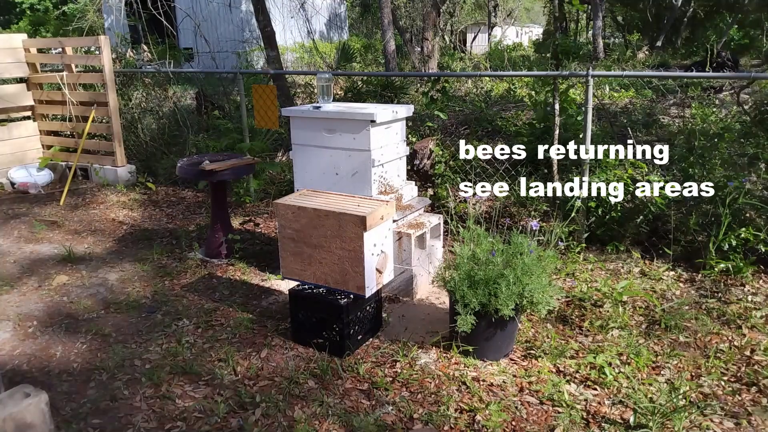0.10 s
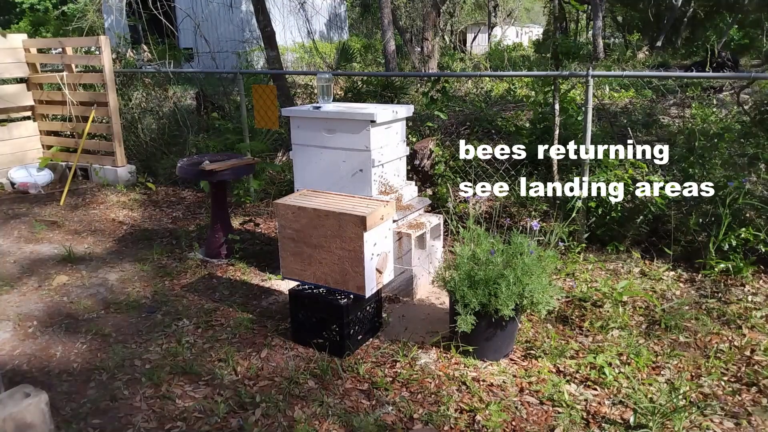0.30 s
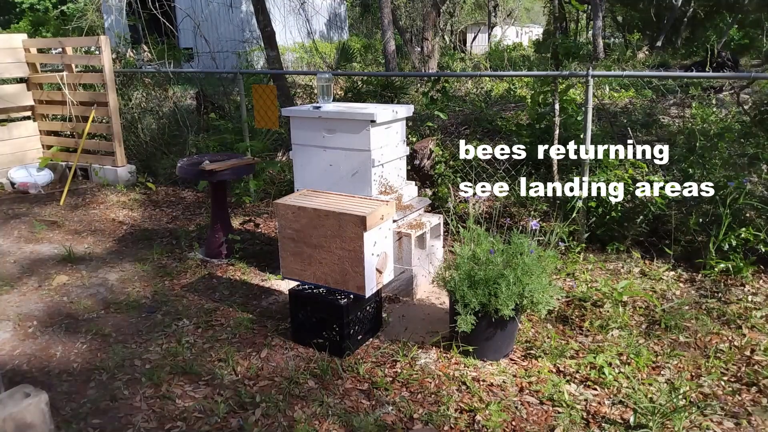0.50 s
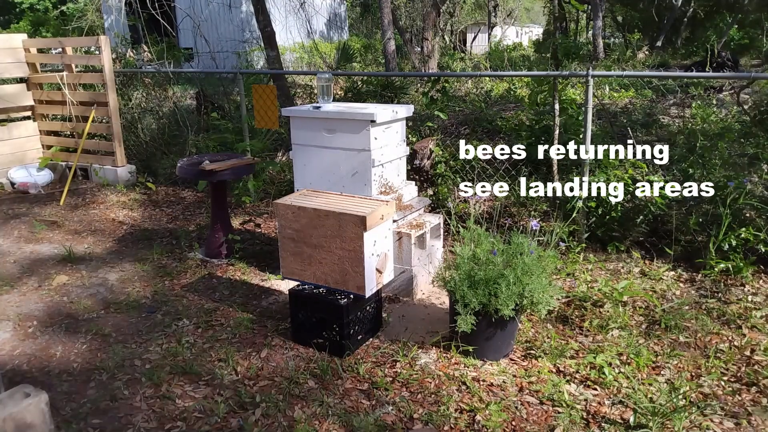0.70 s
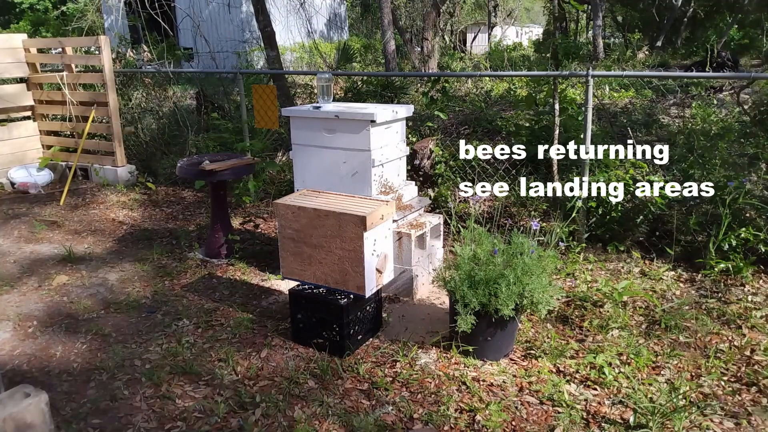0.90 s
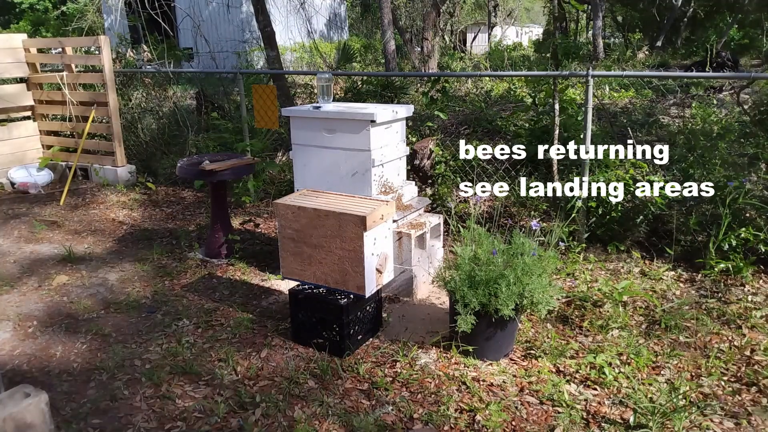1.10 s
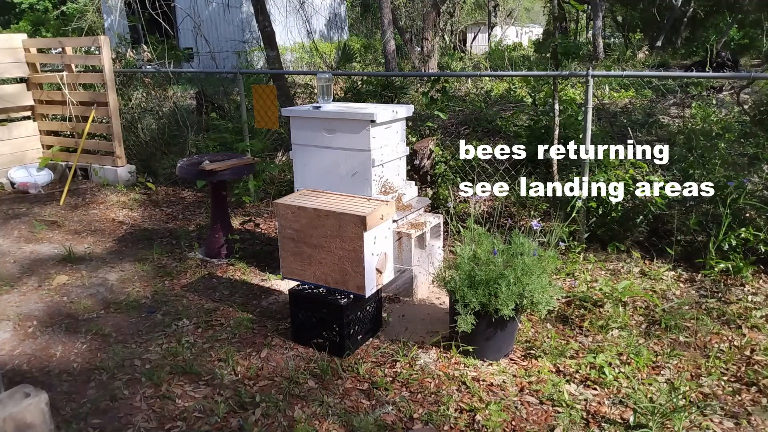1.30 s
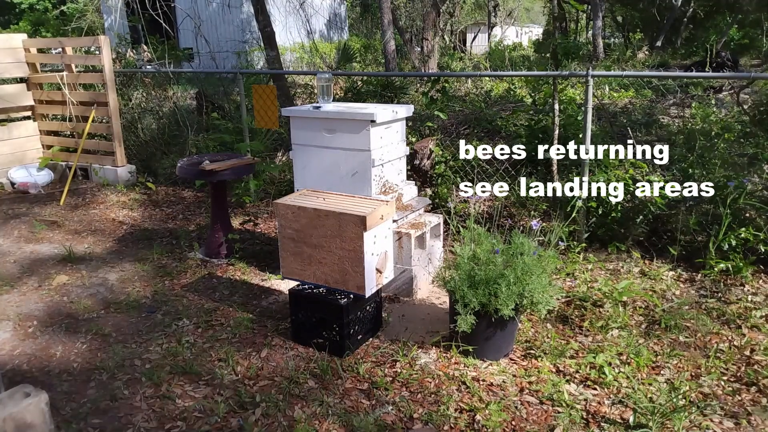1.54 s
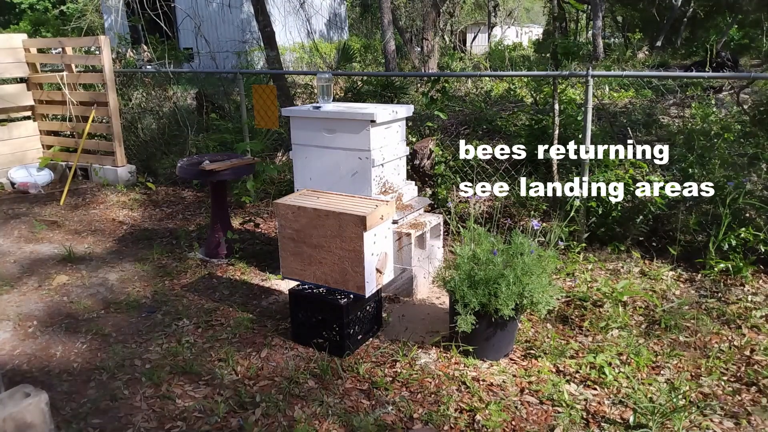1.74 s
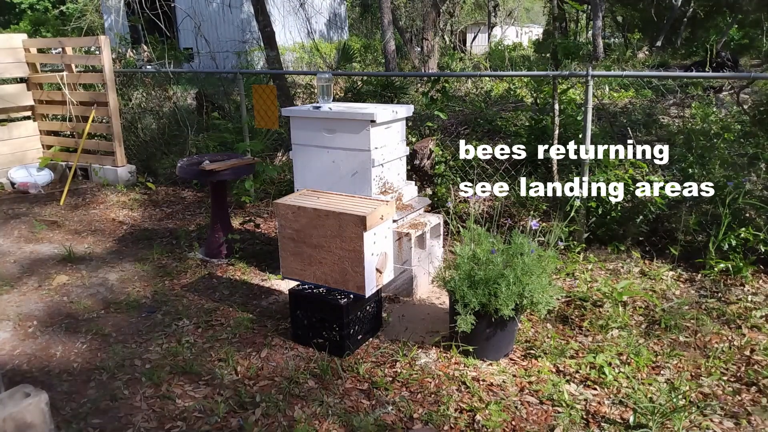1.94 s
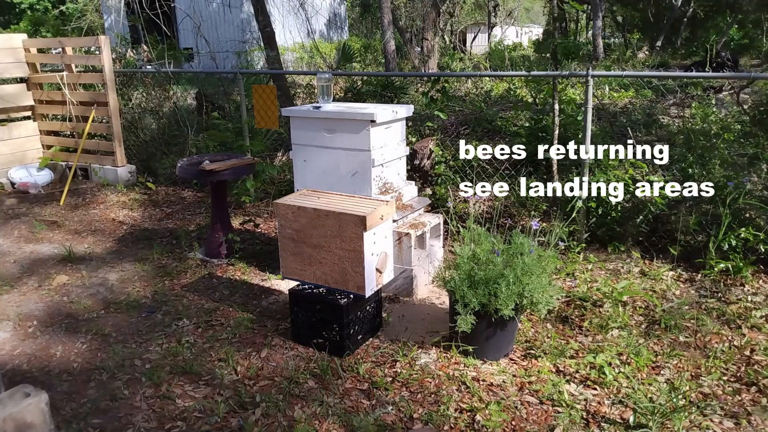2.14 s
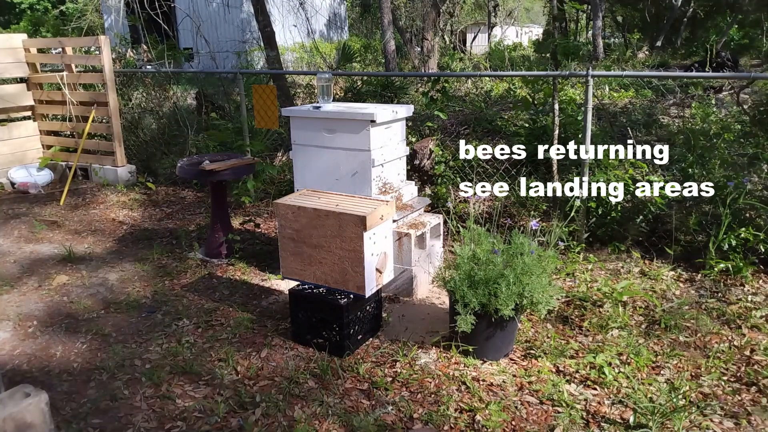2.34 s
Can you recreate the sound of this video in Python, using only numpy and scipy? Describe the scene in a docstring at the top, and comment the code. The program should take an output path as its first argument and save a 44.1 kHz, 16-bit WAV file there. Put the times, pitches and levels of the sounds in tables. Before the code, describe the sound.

Honey bees hum steadily around hives in a backyard, single bees swelling past, under a thin high insect chorus; wind thumps the stereo microphone early, then dry leaves crackle and a twig snaps close on the right.

```python
"""Honey bees hum around their hives in a backyard, under a high, steady chorus of insects in the trees.
From the start bees hum as harmonic wingbeats, some swelling as they pass; filtered noise makes the chorus.
A light gust of low noise and short thumps buffets the stereo microphone during the first half.
One shrill chorus then gives way to another. Near the end dry leaves crackle close by on the right as
tiny noise bursts, and a small twig snaps as a few short, high ringing modes."""
import sys
import numpy as np
from scipy.fft import rfft, irfft, next_fast_len
from scipy.io import wavfile
from scipy.ndimage import map_coordinates

SR = 44100
rng = np.random.default_rng(int(sys.argv[2]) if len(sys.argv) > 2 else 0)


def persist_wave(psi):
    """Save psi, clipped to +-1, as 16-bit WAV."""
    counts = np.round(np.clip(psi, -1, 1) * 32767).astype(np.int16)
    wavfile.write(sys.argv[1], SR, np.atleast_2d(counts).T)


N = 110250

# The swarm around the hives: wingbeats from slowest to fastest bees, in equal shares: (wingbeat [Hz])
SWARM_WINGBEATS = [195.85, 232.9, 245.1, 251.7, 259.5, 266.2, 274.5]
# Swell of the whole swarm: (time [s], level [dB])
SWARM_SWELL = [(0, -65.5), (.3, -63), (.42, -61.5), (.8, -59), (1.0, -64), (2.0, -64.5), (2.5, -66.5)]
# Single bees passing the microphone:
# (time [s], wingbeat [Hz], glide [Hz per s], level [dB], overtones against the wingbeat [dB])
BEE_PASSES = [(0.101, 274.8, -150, -71.5, 5), (.425, 265.5, -170, -63.5, 4.5), (.6, 257.9, 120, -56, -2),
              (0.711, 256, -100, -58, -4), (0.781, 236, -130, -55.5, -12), (0.789, 263.6, 39.5, -63, 3),
              (0.976, 259.6, 0, -59.5, -2.5), (1.246, 262.5, 169, -60, -5), (1.6, 266, 69.5, -63.5, 1),
              (1.73, 267.4, -59.5, -63, -9), (2.158, 252, -130, -61, -8), (2.289, 246, -60.5, -66, -3)]
WING_DRIFT, WING_FLUTTER = .026, .021  # slow and quick pitch change, as a fraction
FLIGHT_DB, TURN_DB = 3.5, 2  # swing of each bee's level; swing of its overtones as it turns
PASS_S = .038  # a pass swells and fades as a bell curve of this half width


def bees(count=24):
    """A swarm of wingbeats drifting in pitch, level and overtones, with single bees passing."""
    ranks = (np.arange(count) + .5) / count
    shares = np.linspace(0, 1, len(SWARM_WINGBEATS))
    swarm = 0
    for wingbeat_hz in np.interp(ranks, shares, SWARM_WINGBEATS):
        flight = amp(FLIGHT_DB * wobble(6.08))
        hz = wingbeat_hz * np.exp(WING_DRIFT * wobble(7) + WING_FLUTTER * wobble(45))
        swarm = swarm + flight * buzz(hz, TURN_DB * (wobble(7.93) - .5))
    swell_db, = curves(SWARM_SWELL)
    out = amp(swell_db) * unit(swarm)
    for s, wingbeat_hz, glide, db, overtones_db in BEE_PASSES:
        t = np.clip(clock() - s, -5 * PASS_S, 5 * PASS_S)  # the glide stops outside the pass
        hz = (wingbeat_hz + glide * t) * np.exp(WING_FLUTTER * wobble(45))
        out += amp(db) * np.exp(-(t / PASS_S) ** 2 / 2) * buzz(hz, overtones_db)
    return out


# Strength of a bee's harmonics by where they fall: (frequency [Hz], level [dB])
BEE_HARMONICS = [(190, -3.5), (260, -1), (400, 1), (530, -1), (780, -10.5), (1050, -10), (1500, -19),
                 (3000, -25.5)]
BEE_LAG_MS, BEE_SCATTER_MS = 0.16, 0.11  # the left port hears later; spread of that lag among bees


def buzz(hz, overtones_db, order=12):
    """One bee: its wingbeat and a stack of overtones, reaching the two ports at different times."""
    lag_s = (BEE_LAG_MS + BEE_SCATTER_MS * rng.normal()) / 10 ** 3
    beats = np.cumsum(hz) / SR - hz * np.array([[lag_s], [0]])
    gains = amp(along(BEE_HARMONICS, np.arange(1, order + 1) * hz.mean()))
    # one wing stroke of overtones with random phases, read once per beat
    partials = gains[1:] * np.exp(2j * np.pi * rng.random(order - 1))
    stroke = 2 ** 9 * irfft(np.r_[0, 0, partials], 2 ** 10)
    overtones = stroke[(beats % 1 * (len(stroke) - 1)).astype(int)]
    wingbeat = gains[0] * np.cos(2 * np.pi * (beats + rng.random()))
    return wingbeat + amp(overtones_db) * overtones


# Dry leaves close by on the right, swell of the rustle: (time [s], level [dB])
RUSTLE_SWELL = [(0, -85.5), (.91, -92), (.96, -66), (1.02, -72.5), (1.86, -73), (1.9, -61), (1.95, -62.5),
                (1.974, -54), (1.986, -63), (2.004, -60), (2.015, -56.5), (2.065, -63), (2.1, -64),
                (2.2, -65), (2.5, -72)]
# Colour of the rustling leaves: (frequency [Hz], level [dB])
LEAF_COLOUR = [(300, -7), (900, 5.5), (2000, -7), (4000, 4), (7000, -4.5), (9000, 6), (13000, -4.5),
               (16000, -37)]
# Sharp crackles: (time [s], level before the decay [dB], corner where the treble opens [Hz])
LEAF_CRACKLES = [(1.8905, -43, 11100), (1.933, -44, 12500), (1.967, -47, 6000), (1.972, -43, 11000),
                 (1.98, -43, 6500), (2.0025, -37, 9000), (2.0123, -41, 9600), (2.028, -37, 6000),
                 (2.0314, -36, 8050), (2.0402, -37, 9000), (2.0565, -36, 8500), (2.0647, -43, 12000),
                 (2.067, -36, 10150), (2.0895, -40, 9700)]
# Colour of a soft scuff on the ground: (frequency [Hz], level [dB])
SCUFF_COLOUR = [(400, -34), (700, 13), (1100, 8), (1800, -26), (9000, -42)]
SCUFF_S, SCUFF_LENGTH_S, SCUFF_DB = 1.909, 0.0088, -60  # centre, half width of the bell curve, level
RUSTLE_GRAIN_DB = 4  # swing of the rustle's quick, grainy flicker


def leaves():
    """Leaf friction as a grainy noise rustle, with sharp crackles and one soft scuff."""
    rustle_db, = curves(RUSTLE_SWELL)
    grain = unit(amp(RUSTLE_GRAIN_DB * wobble(700)))
    out = pan(right_db=6.0) * amp(rustle_db) * grain * rush(LEAF_COLOUR, 0.41)
    for s, db, hz in LEAF_CRACKLES:
        burst = pan(right_db=9.5) * amp(db) * crackle(hz)
        out[:, round(s * SR):][:, :burst.shape[1]] += burst
    scuff = np.exp(-((clock() - SCUFF_S) / SCUFF_LENGTH_S) ** 2 / 2) * rush(SCUFF_COLOUR, 0.26)
    return out + amp(SCUFF_DB) * scuff


# Colour of one crackle: (multiple of its corner frequency [ratio], level [dB])
CRACKLE_COLOUR = [(.1, -29), (.4, -7), (1, 0), (1.6, 3.5), (3, 3.5)]
CRACKLE_T60_S = .006  # time to fall by 60 dB


def crackle(hz, size=1024):
    """One leaf cracks: a tiny decaying burst of noise, its treble opening up around hz."""
    shape = np.array(CRACKLE_COLOUR) * [hz, 1]
    colour = amp(along(shape, np.fft.rfftfreq(size, 1 / SR)))
    burst = unit(irfft(rfft(rng.standard_normal((2, size))) * colour, size))
    return burst * amp(-60 * np.arange(size) / SR / CRACKLE_T60_S)


# Fractures of the small twig, well to the right: (time [s], level [dB])
TWIG_FRACTURES = [(2.1203, -24), (2.1228, -43)]
# Ringing modes of the twig: (frequency [Hz], level [dB], time to fall by 60 dB [s])
TWIG_MODES = [(4900, -21, .006), (10450, 0.5, 0.0029), (11920, -3, 0.0036), (14300, 6, 0.00151),
              (14900, -1, 0.00254)]


def twig():
    """Each fracture rings the twig's short, high modes as decaying sines."""
    out = np.zeros(N)
    for s, db in TWIG_FRACTURES:
        t = np.maximum(clock() - s, 0)
        ring = sum(amp(level - 60 * t / t60) * np.sin(2 * np.pi * hz * t) for hz, level, t60 in TWIG_MODES)
        onset = 1 - np.exp(-t / 0.0004)
        out += amp(db) * ring * onset
    return pan(right_db=18.5) * out


# The gust rumbling at the microphone: (time [s], left level [dB], right level [dB])
RUMBLE_SWELL = [(0, -69, -63), (.1, -50.5, -58.5), (.18, -61, -59), (.42, -49, -47), (.6, -41.5, -48),
                (.8, -49, -47), (1.04, -61, -65), (1.23, -49.5, -59.5), (1.33, -64.5, -60.5),
                (1.5, -64.5, -67), (2.5, -81.5, -80)]
# Colour of the rumble: (frequency [Hz], level [dB])
RUMBLE_COLOUR = [(20, -17), (40, -4), (60, -3.5), (105, 2.5), (150, -10), (220, -23), (320, -36),
                 (700, -91)]
# Eddies thumping on the two ports: (time [s], left level [dB], right level [dB])
EDDY_THUMPS = [(.214, -41, -62), (0.268, -40.5, -43.5), (.315, -36.5, -46), (0.376, -23, -55),
               (.477, -25.5, -52), (0.514, -28.5, -51), (0.536, -26, -36.5), (.555, -25, -55),
               (.584, -27.5, -53), (0.604, -32, -60), (0.693, -33.5, -45), (0.713, -35, -49),
               (.763, -36.5, -29), (0.779, -64, -30.5), (.838, -39.5, -63), (0.957, -40.5, -64),
               (0.986, -33.5, -52), (1.098, -42.5, -56), (1.14, -46, -62), (1.198, -36, -45),
               (1.211, -50, -36), (1.227, -40, -49)]
# Soft rush of the gust through the yard: (time [s], level [dB])
BREEZE_SWELL = [(0, -90), (.28, -71.5), (.39, -61.5), (.6, -62.5), (.8, -64), (.88, -67), (1.1, -70.5),
                (1.25, -63.5), (1.33, -75), (2.5, -79.5)]
# Colour of that rush: (frequency [Hz], level [dB])
BREEZE_COLOUR = [(100, -1), (330, -3.5), (700, -9), (1200, -6.5), (2500, -16), (4000, -23.5), (9000, -33)]
RUMBLE_FLUTTER_DB = 2  # random swing of the rumble on each port
THUMP_HZ, THUMP_UPPER_DB = 100, -19  # middle pitch; level of the brighter octave
THUMP_RISE_S, THUMP_FALL_S = .0022, .0078  # time constants


def wind():
    """Turbulence rumbles and thumps on each port, and the gust rushes softly through the yard."""
    t = clock()
    flutter_db = RUMBLE_FLUTTER_DB * np.array([wobble(35.1), wobble(35.4)])
    out = amp(np.array(curves(RUMBLE_SWELL)) + flutter_db) * rush(RUMBLE_COLOUR, .1)
    for s, left_db, right_db in EDDY_THUMPS:
        detune = np.exp(rng.normal(0, 0.12, (2, 1)))  # each port has its own pitch
        phase = 2 * np.pi * THUMP_HZ * (t - s) * detune
        push = np.cos(phase) + amp(THUMP_UPPER_DB) * np.cos(2 * phase)
        # exponential rise before s, exponential fall after it
        swell = 2 * np.exp(-np.logaddexp((s - t) / THUMP_RISE_S, (t - s) / THUMP_FALL_S))
        out += amp([[left_db], [right_db]]) * swell * push
    breeze_db, = curves(BREEZE_SWELL)
    return out + amp(breeze_db + 2.85 * wobble(20.02)) * rush(BREEZE_COLOUR, 0.29)


# Two shrill choruses, one giving way to the other: (time [s], first level [dB], second level [dB])
SHRILL_SWELL = [(0, -59, -75), (.35, -60.5, -77), (.7, -61.5, -73), (.95, -64, -74), (1.2, -64, -67),
                (1.6, -66.5, -62), (1.83, -72, -64.5), (1.95, -80, -62.5), (2.25, -71, -62.5),
                (2.5, -74, -63)]
# Colour of the first chorus: (frequency [Hz], level [dB])
FIRST_SHRILL_COLOUR = [(6500, -30.5), (8100, -38), (8700, -11), (9700, -5.5), (10400, -6.5), (11200, -14.5),
                       (12900, -13.5), (14000, -7), (14700, -11.5), (15400, -24)]
# Colour of the second chorus: (frequency [Hz], level [dB])
SECOND_SHRILL_COLOUR = [(6500, -61), (7700, -10), (8800, 2.5), (9600, -2.5), (10500, -2), (11200, -9.5),
                        (12300, -4.5), (13600, -3.5), (15400, -12.5)]


def shrill_insects():
    """Two dense choruses of streaked noise high in the treble, off to the right."""
    first_db, second_db = curves(SHRILL_SWELL)
    first = amp(first_db + 1.1 * wobble(15.6)) * streaked(rush(FIRST_SHRILL_COLOUR, 0.68))
    second = amp(second_db + 0.49 * wobble(22)) * streaked(rush(SECOND_SHRILL_COLOUR, 0.62))
    return pan(right_db=4.5) * first + pan(right_db=8.0) * second


SHRILL_STREAK_DB = 2.5  # single singers stand out as fine streaks


def streaked(x):
    """Raise and lower narrow lines of a noise at random."""
    knots = rng.standard_normal(size=500)
    knots_hz = np.linspace(0, SR / 2, len(knots))
    return unit(filtered(x, lambda hz: amp(SHRILL_STREAK_DB * np.interp(hz, knots_hz, knots))))


# Two far cicada choruses: (time [s], lower chorus level [dB], higher chorus level [dB])
CICADA_SWELL = [(0, -65, -73), (.76, -65, -80), (.84, -67, -72.5), (1.4, -65.5, -70), (1.85, -69.5, -73),
                (2.15, -67.5, -68.5), (2.5, -67.5, -70)]
# Colour of the lower chorus: (frequency [Hz], level [dB])
LOW_CICADA_COLOUR = [(3700, -46), (4150, -7), (4550, -2.5), (5000, 0.5), (5280, 0), (5520, -32)]
# Colour of the higher chorus: (frequency [Hz], level [dB])
HIGH_CICADA_COLOUR = [(4900, -26), (5250, -4), (5620, 2.5), (5950, -36)]
# Nearer cicadas: (start [s], end [s], frequency [Hz], level [dB])
NEAR_CICADAS = [(.25, .6, 5060, -75), (.78, 1.25, 5535, -72.5), (.8, 1.2, 5295, -76),
                (1.22, 1.75, 5615, -78), (1.66, 2.5, 4765, -78), (2.04, 2.37, 5433, -76)]
TYMBAL_HZ, TYMBAL_DEPTH = 225, .35  # mean pulse rate; depth as a fraction
SINGER_FADE_S, SINGER_WAVER = .05, .002  # fade in and out; pitch waver as a fraction


def cicadas():
    """Far choruses of noise pulsed by tymbals, and nearer singers that each hold a thin tone for a while."""
    t = clock()
    low_db, high_db = curves(CICADA_SWELL)
    song = amp(low_db) * rush(LOW_CICADA_COLOUR, 0.18, lag_ms=0.22)
    song += amp(high_db) * rush(HIGH_CICADA_COLOUR, 0.18, lag_ms=0.22)
    pulse_hz = TYMBAL_HZ * (1 + 0.0146 * wobble(8.58))
    song *= 1 + TYMBAL_DEPTH * np.cos(2 * np.pi * np.cumsum(pulse_hz) / SR)
    for start, end, hz, db in NEAR_CICADAS:
        phase = 2 * np.pi * np.cumsum(hz * (1 + SINGER_WAVER * wobble(60))) / SR
        gate = np.clip(np.minimum(t - start, end - t) / SINGER_FADE_S, 0, 1)
        tone = np.sin(phase + rng.normal(0, 0.28, (2, 1)))  # a small phase offset at each port
        song += amp(db + 5.9 * wobble(35.05)) * gate * tone
    return pan(right_db=3.0) * song


# Colour of the quiet outdoor air: (frequency [Hz], level [dB])
AIR_COLOUR = [(25, -34), (100, 4), (330, -5), (700, -7), (1200, -6), (2000, -13), (3500, -17.5),
              (7000, -16.5), (15000, -35)]
# How alike the air sounds at the two ports: (frequency [Hz], left-right likeness [0 to 1])
AIR_LIKENESS = [(60, 1), (200, 0.87), (500, 0.79), (1300, 0.23), (2500, 0.23), (10000, 0.97)]
AIR_DB = -67.5


def outdoor_air():
    """Steady diffuse noise whose left-right likeness depends on frequency."""
    return pan(right_db=1.0) * amp(AIR_DB) * rush(AIR_COLOUR, AIR_LIKENESS, lag_ms=0.15)


def rush(spectrum, alike, lag_ms=0):
    """Coloured stereo noise of rms 1, left delayed by lag_ms; alike is a number or (Hz, likeness) points."""
    def mid_side(hz):
        likeness = along(alike, hz) if np.ndim(alike) else alike + 0 * hz
        angle = np.arccos(np.clip(likeness, -1, 1)) / 2
        return amp(along(spectrum, hz)) * [np.cos(angle), np.sin(angle)]
    mid, side = filtered(rng.standard_normal((2, N)), mid_side)
    left = filtered(mid + side, lambda hz: np.exp(-2j * np.pi * hz * lag_ms / 10 ** 3))
    return unit(np.array([left, mid - side]))


def pan(right_db):
    """Channel gains for a source louder on the right by right_db."""
    return amp(np.array([[-right_db], [right_db]]) / 2)


def filtered(x, response):
    """x times a complex response of frequency."""
    m = next_fast_len(N + SR // 4)
    return irfft(rfft(x, m) * response(np.fft.rfftfreq(m, 1 / SR)), m)[..., :N]


def wobble(rate):
    """A smooth random curve, rate knots a second."""
    span = N * rate / SR
    at = np.arange(int(span * 10) + 2) / 10
    knots = rng.standard_normal(int(span) + 4)
    return np.interp(clock() * rate, at, map_coordinates(knots, [at + 1]))


def curves(rows):
    """One value per sample for each column after the time."""
    s, *cols = np.transpose(rows)
    return [np.interp(clock(), s, c) for c in cols]


def clock():
    """Time of each sample in seconds."""
    return np.arange(N) / SR


def along(points, hz):
    """(Hz, value) points read on a log frequency axis."""
    f, v = np.transpose(points)
    return np.interp(np.log(hz + 1), np.log(f + 1), v)


def unit(x):
    """Scale to rms 1."""
    return x / np.sqrt(np.mean(x ** 2) + 1e-20)


def amp(db):
    """Decibels to gain."""
    return np.exp(np.asarray(db) * np.log(10) / 20)


def scene():
    """Bees, leaves and twig, wind and insects over the quiet outdoor air."""
    near = pan(right_db=1.5) * bees() + leaves() + twig() + wind()
    return near + shrill_insects() + cicadas() + outdoor_air()


LOW_CUT_HZ, TOP_HZ = 36, 15900  # the microphone's bass roll-off; the band limit


def record(dry):
    """The microphone sheds the deepest bass, and nothing above the band limit is kept."""
    def response(hz):
        bass_cut = hz ** 3 / np.hypot(hz ** 3, LOW_CUT_HZ ** 3)
        return bass_cut * (hz < TOP_HZ)
    return filtered(dry, response)


dry = scene()
out = record(dry)
persist_wave(out)
```